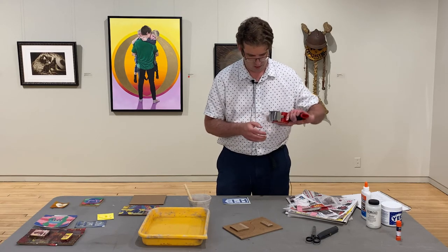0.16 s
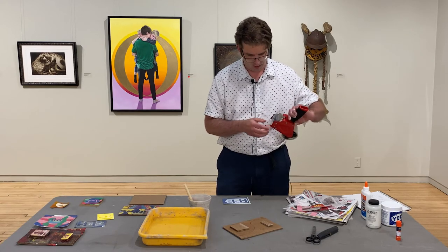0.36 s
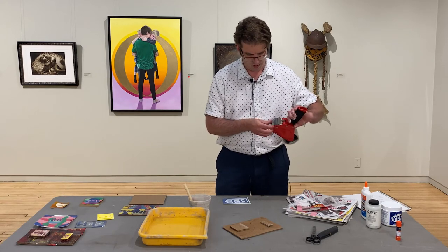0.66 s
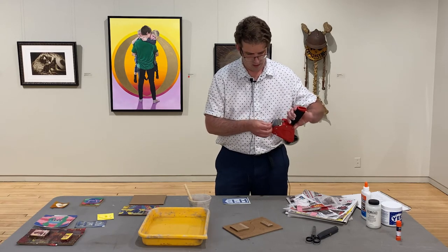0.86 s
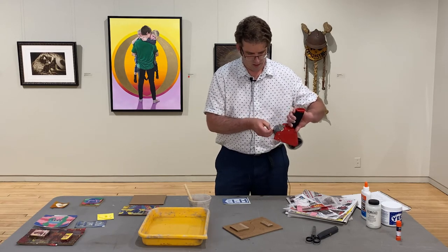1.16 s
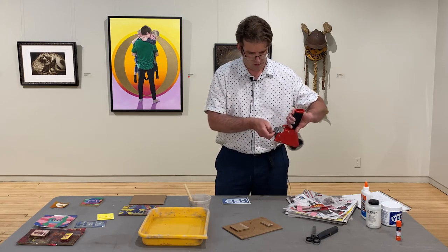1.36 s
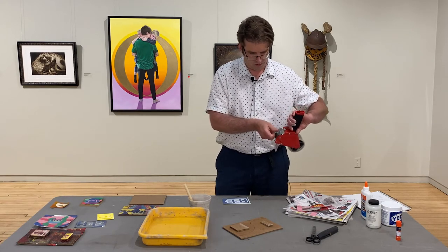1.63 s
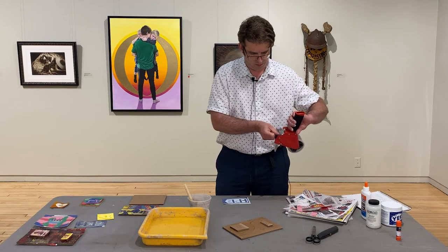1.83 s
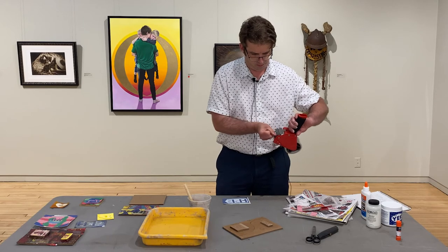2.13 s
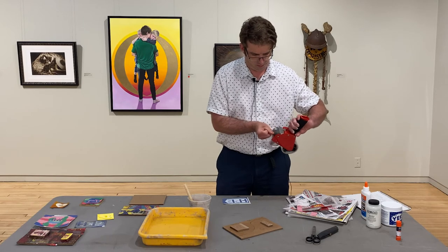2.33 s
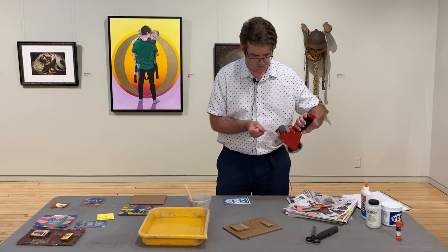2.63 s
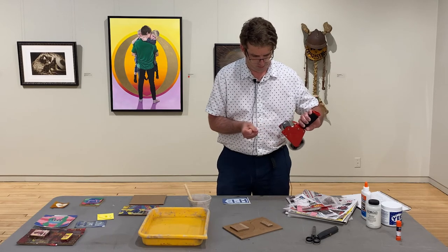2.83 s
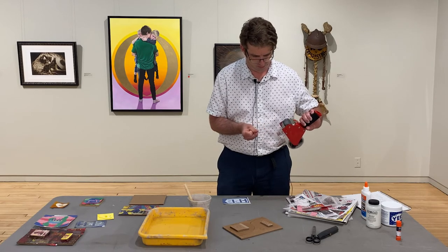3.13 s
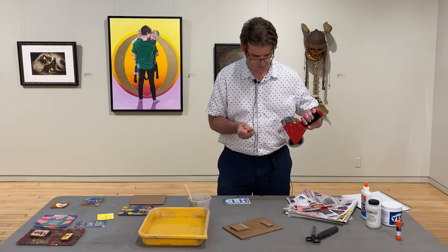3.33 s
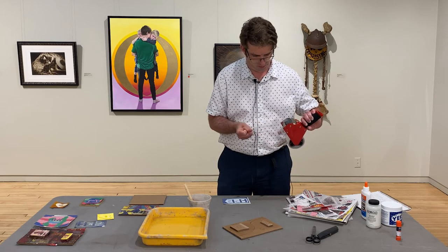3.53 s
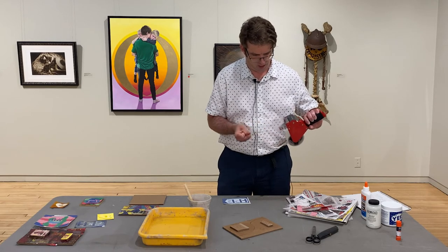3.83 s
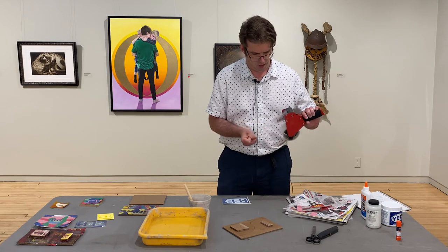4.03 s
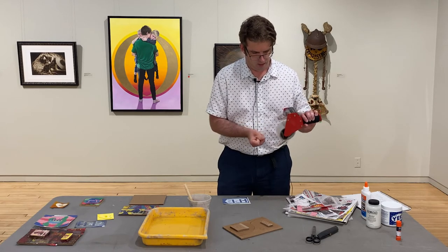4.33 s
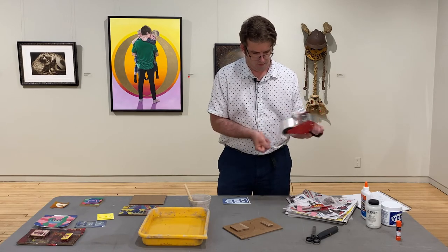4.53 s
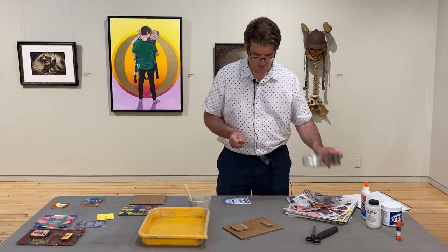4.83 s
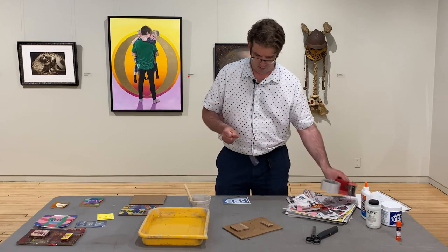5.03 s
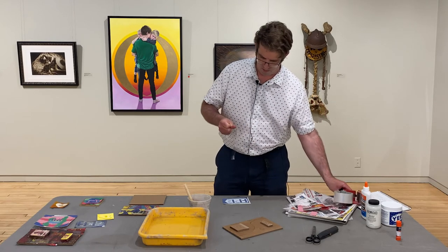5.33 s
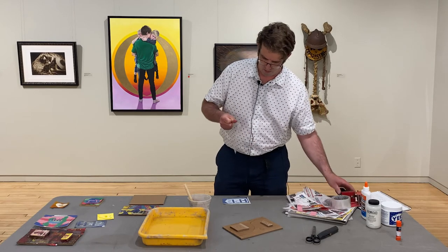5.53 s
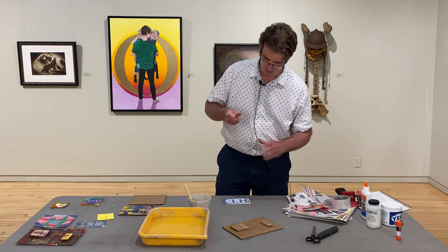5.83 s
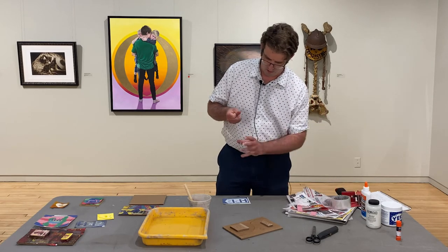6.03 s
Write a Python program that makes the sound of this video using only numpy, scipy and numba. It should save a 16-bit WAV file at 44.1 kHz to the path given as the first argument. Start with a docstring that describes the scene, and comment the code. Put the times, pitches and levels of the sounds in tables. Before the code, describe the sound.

Handheld packing tape dispenser in a hard-walled room: quiet handling and tiny sharp ticks, then a stuttering series of harsh, dry rips as the glue slips, with hollow plastic rattle and brief twangs of the taut film. After a pause, the tape snaps across the blade with a metallic edge. Soft dull thumps and light ticks end it. Clear close pickup, limited peaks, diffuse room echo and low air rumble.

```python
"""In a bare, echoing gallery, packing tape is picked loose, pulled off a handheld dispenser in five jerks
and torn on the blade. The glue lets go in slips: each is a noisy crack that runs across the tape, colours
as the snap of the film and rings the roll and frame; plucked tones twang in the free strip.
The dispenser then lands on a pile of magazines in muffled bumps of noise. Hands and sleeves brush softly,
ventilation rumbles behind, and a fast limiter holds the loudest cracks down."""
import sys
import numpy as np
from scipy import signal
from scipy.fft import rfft, irfft
from scipy.io import wavfile
from scipy.ndimage import uniform_filter1d, minimum_filter1d
from numba import njit

SR = 44100
rng = np.random.default_rng(int(sys.argv[2]) if len(sys.argv) > 2 else 0)


def master_out(mix):
    """Clip the mix to full scale and print it as 16-bit PCM to the path in sys.argv[1]."""
    frames = np.transpose(np.atleast_2d(mix))
    ceiling = np.clip(frames, -1, 1)
    pcm = np.round(ceiling * 32767).astype(np.int16)
    wavfile.write(sys.argv[1], SR, pcm)


N = 272008  # length in samples

# spectral shape of the snapping film: pitch_hz, relative_level_db
FILM_COLOUR = [(60, -30.5), (150, -24.5), (300, -12.5), (1000, -5), (2500, -4.5), (4000, -6), (5900, -8),
               (7500, -4), (9000, -0.5), (10000, 4), (11200, -1.5), (13000, -11), (15500, -18.5),
               (18000, -38)]


def undb(db):
    """Decibels to an amplitude factor."""
    return 10 ** (np.asarray(db) / 20)


def unit(x):
    """Scale to rms 1."""
    return x / np.sqrt(np.mean(x ** 2))


def add(track, s, sound):
    """Mix a sound into a track at a time in seconds."""
    i = int(s * SR)
    track[i:i + len(sound)] += sound[:N - i]


def fade(t60):
    """Exponential decay that falls 60 dB in t60 seconds."""
    return np.exp(-np.log(1000) * np.arange(int(t60 * SR) + 2) / (t60 * SR))


def fading_noise(t60):
    """White noise that dies away exponentially."""
    decay = fade(t60)
    return decay * rng.standard_normal(len(decay))


def unit_energy(x):
    """Scale so that the squares sum to 1."""
    return x / np.linalg.norm(x)


def colour(x, points):
    """Filter with the given (Hz, dB) response, minimum phase so that nothing sounds before its cause."""
    size = 16384
    hz, db = np.transpose(points)
    bins_hz = np.arange(size // 2 + 1) * SR / size
    log_gain = np.log(undb(np.interp(np.log(bins_hz + 1), np.log(hz), db)))
    # folding the cepstrum forward in time gives the minimum phase
    cepstrum = irfft(log_gain)[:size // 2]
    cepstrum[1:] *= 2
    impulse = irfft(np.exp(rfft(cepstrum, size)))
    return signal.fftconvolve(x, impulse)[:len(x)]


def resonate(x, hz, width):
    """One resonance, gain 1 at its centre."""
    b, a = signal.iirpeak(hz, hz / width, fs=SR)
    return signal.lfilter(b, a, x)


def ring(x, modes):
    """A body of several resonances struck by the same drive."""
    return sum(undb(db) * resonate(x, hz, width) for hz, width, db in modes)


def bandpass(x, order, low_hz, high_hz):
    """Keep one frequency range."""
    return signal.sosfilt(signal.butter(order, [low_hz, high_hz], "band", fs=SR, output="sos"), x)


def peeling(strip_t60=0.053, strip_spread=0.19):
    """Slips snap the film, ring the roll and frame and pluck the free strip; a few leave it twanging."""
    # the glue gives once and holds again: start_s, level_db, crack_ms, body_drive_re_film_db
    single_slips = [(2.0805, -31, 1, 5), (2.1005, -27.5, 1.5, 1), (2.1045, -20, 2.3, 2.5),
                    (2.1205, -9, 2, -9), (2.181, -1, 0.49, 2), (3.115, 0, 3.4, -19.5), (3.225, -4, 1, -7),
                    (3.6915, 8, 4.1, 3.5)]
    # runs of slips: first_s, last_s, rate_per_s, first_level_db, last_level_db, crack_ms, body_drive_re_film_db
    pulls = [(2.164, 2.1702, 190, -2.5, 3.5, 0.56, -3.5), (2.352, 2.359, 125, 5.5, 10, 3.5, -3.5),
             (2.3878, 2.399, 218, 0, -1, 3.6, -1.5), (2.404, 2.458, 405, 1, 0, 1.74, 6.5),
             (2.461, 2.515, 360, -3, 1.5, 1.6, -1), (2.71, 2.7196, 101, 9, 7, 2.68, 3),
             (2.732, 2.751, 114, 10.5, 6.5, 2.85, 7), (2.7577, 2.818, 425, 4.5, -1, 1.48, -1),
             (2.827, 2.831, 140, -8, -3.5, 0.54, 1), (3.2828, 3.294, 218, -4.5, -8.5, 1.86, 2.5),
             (3.298, 3.302, 220, -1.5, 1.5, 3.9, 13), (3.3109, 3.3702, 86, 7.5, -5.5, 3.35, 7),
             (3.7382, 3.76, 157, 2, 8, 4.35, 3.5), (3.794, 3.825, 134.5, -0.5, -1, 3.19, 2)]
    # resonances of the roll and frame: pitch_hz, width_hz, relative_level_db
    frame_modes = [(345, 28, -15), (394, 28, -4), (818, 70, -8.5), (1265, 87, -5), (1437, 170, 1),
                   (1578, 160, 1), (1770, 220, 2), (1950, 150, -6.5), (2590, 250, -15), (3600, 190, -18.5),
                   (4740, 130, -13.5)]
    # the free strip drums mostly lower as it grows longer: time_s, pitch_hz, level_re_slip_db
    strip_course = [(2.15, 370, -26), (2.44, 400, -27.5), (2.78, 310, -32.5), (3.32, 310, -30.5),
                    (3.70, 190, -31), (3.82, 150, -31.5)]
    # the taut strip twangs after a slip: start_s, start_pitch_hz, level_db, t60_s, pitch_rise_octaves_per_s
    strip_twangs = [(2.0807, 3370, -23, 0.0066, 1), (2.1043, 3800, -13, .006, -2.5),
                    (2.778, 3859, -10.5, .02, -2), (2.792, 4110, -7, .02, -0.5),
                    (2.804, 3940, -8.5, .02, 0), (3.116, 3810, -23.5, 0.042, -0.5),
                    (3.2265, 1590, -14, 0.056, 8.5), (3.324, 2630, -13.5, 0.054, 1.5),
                    (3.691, 2570, -12.5, .029, -1)]

    slips = single_slips + [slip for pull in pulls for slip in run_of_slips(*pull)]
    film, body = cracks(slips, volley_db=2, end_db=-5, scatter_db=-7, scatter_t60=0.048)
    out = undb(13.0) * colour(film, FILM_COLOUR) + undb(13.5) * ring(body, frame_modes)

    times, strip_hz, strip_db = np.transpose(strip_course)
    for (s, db, *_), tension in zip(slips, rng.standard_normal(len(slips))):
        hz = np.interp(s, times, strip_hz) * np.exp(strip_spread * tension)
        level_db = db + np.interp(s, times, strip_db)
        add(out, s, undb(level_db) * twang(hz, strip_t60))

    for s, hz, db, t60, rise in strip_twangs:
        add(out, s, undb(db) * twang(hz, t60, rise))
    return out


def run_of_slips(first, last, rate, first_db, last_db, ms, body_db):
    """Stick and slip at a steady rate while the force drifts; the faster the run, the more ragged it is."""
    full_ragged_per_s = 360
    # full scatter: timing as a share of a gap, strength, ring
    jitter, uneven_db, shake_db = 0.3, 2.5, 1
    # the roll is at rest when a run starts: its ring is weaker and catches up
    slack_db, slack_s = -6, 0.012

    count = int(round((last - first) * rate)) + 1
    raggedness = min(rate / full_ragged_per_s, 1) ** 2
    gap, size, shake = raggedness * rng.standard_normal((3, count))
    gap[0] = 0  # the first slip is on time
    times = np.linspace(first, last, count) + jitter * gap / rate
    db = np.linspace(first_db, last_db, count) + uneven_db * size
    slack = slack_db * np.exp(-np.abs(times - first) / slack_s)
    ring_db = body_db + slack + shake_db * shake
    return list(zip(times, db, np.full(count, ms), ring_db))


def cracks(rows, volley_db, end_db, scatter_db, scatter_t60):
    """A crack snaps at one edge, crackles across and snaps at the other; returns film and body drive."""
    film, body = np.zeros(N), np.zeros(N)
    for s, db, ms, body_db in rows:
        volley = rng.standard_normal(int(ms * SR / 1000) + 2)
        volley *= undb(volley_db) / np.linalg.norm(volley)
        volley[0] += 1
        volley[-1] -= undb(end_db)  # the far edge snaps the opposite way
        # hands, chest and table throw the crack back within a few hundredths of a second
        scatter = undb(scatter_db) * unit_energy(fading_noise(scatter_t60))
        for part in unit_energy(volley), scatter:
            add(film, s, undb(db) * part)
            add(body, s, undb(db + body_db) * part)
    return film, body


def twang(hz, t60, rise=0):
    """A plucked strip: a fading tone whose pitch glides by rise octaves per second as the tension changes."""
    decay = fade(t60)
    pitch_hz = hz * 2 ** (rise * np.arange(len(decay)) / SR)
    return decay * np.sin(2 * np.pi * np.cumsum(pitch_hz) / SR)


def cutting():
    """The film splits along the teeth, thin and bright, and the blade rings."""
    # the teeth prick the tape, bite, rip across and part the last shreds:
    # first_s, last_s, rate_per_s, first_level_db, last_level_db, tear_ms, blade_drive_re_film_db
    tears = [(4.4663, 4.47, 220, -17, -34, 0.87, 2.5), (4.4887, 4.494, 130, -6, -16.5, 1.8, 8.5),
             (4.498, 4.504, 184, -10.5, -10.5, 3, 7.5), (4.521, 4.529, 340, -7.5, -2.5, 2.5, -1.5),
             (4.542, 4.565, 45, -14.5, -24.5, 3.3, 12.5)]
    # ringing of the blade and its holder: pitch_hz, width_hz, relative_level_db
    blade_modes = [(276, 14, -1.5), (510, 290, -7), (1040, 160, -1), (1373, 128, 4), (1587, 230, 7),
                   (2260, 320, -2.5), (2720, 250, -8.5), (3750, 330, -5.5), (6400, 500, -1.5),
                   (7400, 410, -4), (8130, 73, 7), (9350, 250, -23), (10740, 440, 6)]

    snaps = [snap for tear in tears for snap in run_of_slips(*tear)]
    film, body = cracks(snaps, volley_db=1.5, end_db=5, scatter_db=-3, scatter_t60=0.094)
    thin = bandpass(colour(film, FILM_COLOUR), 1, 4500, 14500)
    return undb(16.5) * thin + undb(11.5) * ring(body, blade_modes)


def crackle(spread_db=5, t60=0.0053):
    """Threads of glue part one by one, at random moments and in unequal sizes; the level drifts with time."""
    # sticky tape between the fingers and against the blade:
    # start_s, end_s, rate_per_s, mid_level_db, growth_db, tape_end_drive_re_film_db
    spells = [(0.55, 1.388, 30, -53.5, -4, -8), (1.737, 2.132, 110, -40.5, 4.5, 3),
              (4.17, 4.484, 50, -37.5, 11.5, -8.5), (5.198, 5.902, 22, -57, -4, -8)]
    # the end of the tape rings as the threads part: pitch_hz, width_hz, relative_level_db
    end_modes = [(1900, 460, 1.5), (4000, 900, 3)]

    film, tape_end = np.zeros(N), np.zeros(N)
    for start, end, rate, db, growth_db, ring_db in spells:
        count = int(rate * (end - start))
        for share, size in zip(rng.random(count), rng.standard_normal(count)):
            s = start + share * (end - start)
            snap = unit_energy(fading_noise(t60))
            snap_db = db + growth_db * (share - 0.5) + spread_db * min(size, 1.5)
            add(film, s, undb(snap_db) * snap)
            add(tape_end, s, undb(snap_db + ring_db) * snap)
    return undb(14.0) * colour(film, FILM_COLOUR) + ring(tape_end, end_modes)


def ticks():
    """Tiny snaps of film and plastic, as fading noise in three ranges; the low range rings longest."""
    # ticks of fingernail, sticky tape and plastic: start_s, top_level_db, middle_level_db, low_level_db
    tick_list = [(0.0825, -57, -55, -45), (0.4734, -22.5, -40, -52), (0.5272, -35, -63, -53),
                 (0.534, -47, -62, -39), (0.7267, -37.5, -60, -50.5), (1.0485, -12.5, -45, -53.5),
                 (1.1098, -19.5, -48, -38), (1.1948, -25.5, -42.5, -44.5), (1.2424, -33, -52.5, -45.5),
                 (1.3637, -24, -41.5, -47.5), (1.4213, -30.5, -59.5, -63), (1.7794, -33.5, -56, -48),
                 (1.8172, -34.5, -50, -51), (1.8452, -21.5, -47, -52), (1.8756, -24.5, -46.5, -47),
                 (1.8847, -20.5, -43, -51.5), (1.9777, -32.5, -39.5, -48), (2.0176, -28, -43, -40),
                 (2.0467, -25, -38.5, -43.5), (3.5462, -30, -47, -36.5), (4.2986, -26, -49, -51.5),
                 (4.3106, -26.5, -42.5, -48), (4.34, -17.5, -37, -41), (4.4358, -27, -52, -53),
                 (5.2804, -49.5, -64, -56), (5.4934, -38, -45.5, -52.5), (5.6155, -39, -60, -51.5),
                 (5.6974, -34, -49, -56)]
    # the three ranges of a tick, top first: low_edge_hz, high_edge_hz, added_level_db, t60_s
    ranges = [(7100, 11400, -1.5, 0.0039), (2900, 4700, 2, 0.013), (700, 1800, 3.5, 0.022)]

    out = np.zeros(N)
    for column, (low_hz, high_hz, db, t60) in enumerate(ranges):
        decay = fade(t60)
        for s, *levels in tick_list:
            grain = unit(bandpass(rng.standard_normal(SR // 10), 3, low_hz, high_hz))
            settled = grain[-len(decay):]  # past the build-up of the filter
            add(out, s, undb(levels[column] + db) * decay * settled)
    return out


def landing():
    """The dispenser settles in soft bumps of low-passed noise, muffled by the magazines."""
    # start_s, level_db, upper_edge_hz, t60_s
    bumps = [(5.33, -42, 151.4, 0.095), (5.355, -32.5, 109.2, 0.15), (5.357, -46, 470, 0.31),
             (5.522, -48.5, 1698, 0.17), (5.546, -36, 95, 0.14), (5.552, -43.5, 2200, 0.03)]

    out = np.zeros(N)
    for s, db, hz, t60 in bumps:
        lowpass = signal.butter(3, hz, fs=SR, output="sos")
        thud = signal.sosfilt(lowpass, fading_noise(t60))
        level_match = np.sqrt(SR / 2 / hz)  # makes up for the noise the filter removes
        add(out, s, undb(db) * level_match * thud)
    return out


def brushing(grain_db=2):
    """Skin and cloth slide over plastic in fine grains of noise, in strokes that swell and fade."""
    # strokes: middle_s, half_length_s, peak_level_db
    strokes = [(0, 0.15, -50), (0.286, 0.13, -59.5), (1.046, 0.47, -60), (2.14, 0.24, -52),
               (4.423, 0.16, -53.5), (5.45, 0.3, -61.5)]
    # spectral shape of the rub: pitch_hz, relative_level_db
    rub_colour = [(200, 0), (380, 5), (600, 1), (850, 3.5), (1300, 5.5), (2500, -6), (4800, -6.5),
                  (6800, -6.5), (9000, -11.5), (11500, -16), (13000, -25), (16000, -41.5)]

    t = np.arange(N) / SR
    grain_size = 128  # samples
    grain_levels = np.repeat(rng.standard_normal(N // grain_size + 1), grain_size)[:N]
    grains = undb(grain_db * grain_levels)
    pressure = sum(undb(db) * np.exp(-((t - s) / half) ** 2) for s, half, db in strokes)
    return pressure * unit(colour(grains * rng.standard_normal(N), rub_colour))


def gallery(x, first_s=0.0019, build_s=0.0033):
    """A diffuse echo off bare walls: noise in blended bands, each dying away at its own pace."""
    # echo bands: centre_hz, echo_level_db, t60_s
    echo_bands = [(100, -13, 0.45), (300, -6.5, 0.88), (750, -8.5, 1.5), (1600, -15.5, 1.3),
                  (2920, -13.5, 1.3), (5500, -14, 1.35), (8000, -13.5, 0.94), (10200, -22, 0.78),
                  (15000, -19.5, 0.4)]

    size = 2 * SR
    t = np.arange(size) / SR
    log_hz = np.log(np.arange(size // 2 + 1) * SR / size + 1)
    noise = rfft(rng.standard_normal(size))
    centres = np.log(np.array(echo_bands)[:, 0])
    echo = np.zeros(size)
    for (_, db, t60), own in zip(echo_bands, np.eye(len(echo_bands))):
        band = irfft(noise * np.interp(log_hz, centres, own))  # neighbouring bands blend into each other
        loss = np.log(1000) / t60
        equal_energy = np.sqrt(2 * loss / SR)  # long and short decays weigh the same
        echo += undb(db) * equal_energy * np.exp(-loss * t) * band
    onset = np.clip((t - first_s) / build_s, 0, 1)
    return signal.fftconvolve(x, echo * onset)[:N]


def ventilation():
    """Steady coloured noise: the rumble of ventilation and microphone hiss."""
    # pitch_hz, density_db_per_hz
    air_colour = [(5, -59.5), (12, -46.5), (26, -63), (40, -68), (80, -77), (125, -79), (250, -91),
                  (630, -96.5), (1250, -99), (2500, -106), (5000, -110), (7500, -107), (10500, -109),
                  (13000, -124), (16000, -137)]
    return np.sqrt(SR / 2) * colour(rng.standard_normal(N), air_colour)


def scene():
    """Tape, blade, ticks and landing echo in the gallery; brushing and ventilation stay dry."""
    tape, cut = peeling(), cutting()
    small = ticks() + crackle() + landing()
    # the echo averages three fresh random draws of the tape and blade noise, for a smooth, diffuse tail
    tape_echo = sum(gallery(peeling() + undb(4.5) * cutting()) for _ in range(3)) / np.sqrt(3)
    echo = tape_echo + undb(-2.5) * gallery(small)
    return (tape + cut + small + echo + brushing() + ventilation())[None]


@njit
def peak_follower(x, release):
    """Jumps to each peak and sinks back by the release factor per sample."""
    out, e = np.empty(len(x)), 0.
    for i in range(len(x)):
        e = max(abs(x[i]), e * release)
        out[i] = e
    return out


def record(dry, threshold=1.0, release_s=0.0028, top_hz=15900):
    """A fast limiter holds loud cracks down, the preamplifier flattens what gets past, the top is cut."""
    peak = peak_follower(dry[0], np.exp(-1 / (release_s * SR)))
    gain = threshold / np.maximum(peak, threshold)
    # the gain drops a few samples ahead of each peak, and smoothly
    held = dry * uniform_filter1d(minimum_filter1d(gain, size=9), size=9)
    flattened = held / (1 + (held / 0.7) ** 6) ** (1 / 6)  # bends towards a ceiling of 0.7
    return signal.fftconvolve(flattened, signal.firwin(161, top_hz, fs=SR)[None], "same")


dry = scene()
out = record(dry)
master_out(out)
```